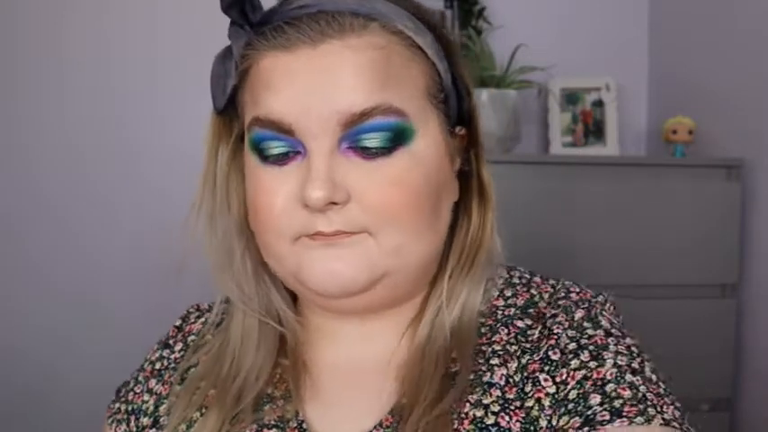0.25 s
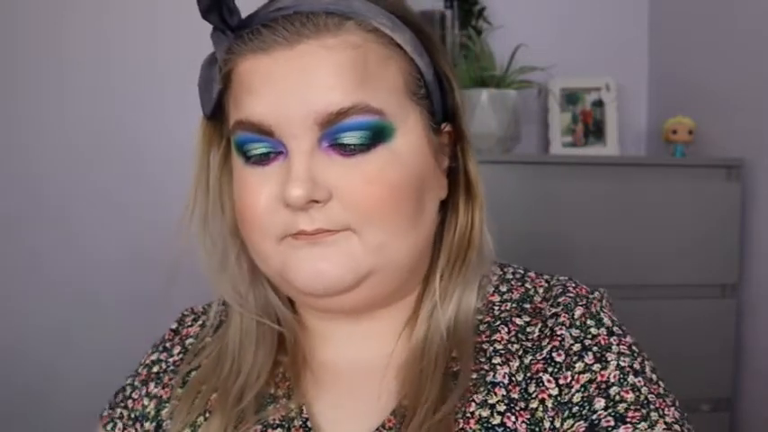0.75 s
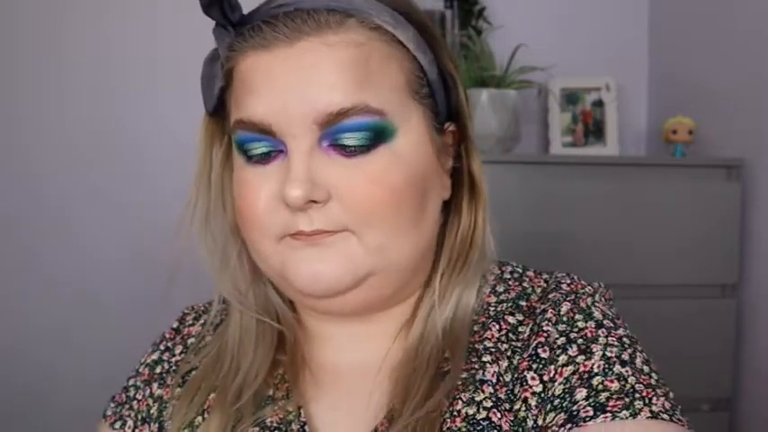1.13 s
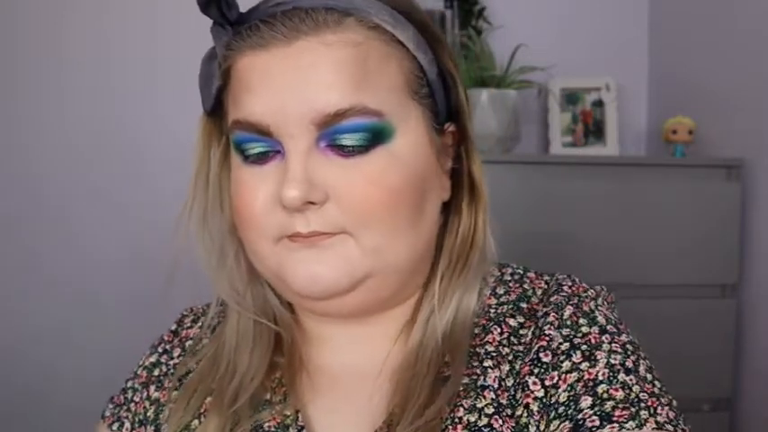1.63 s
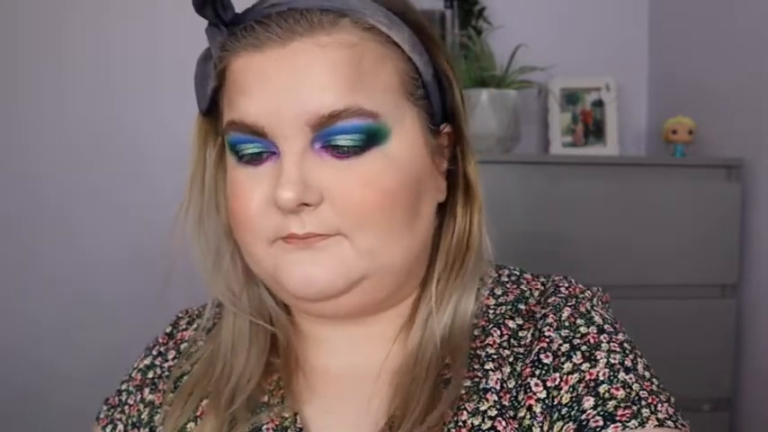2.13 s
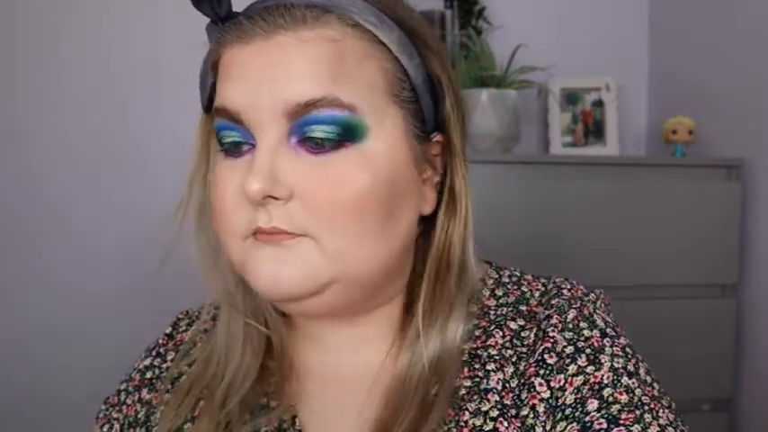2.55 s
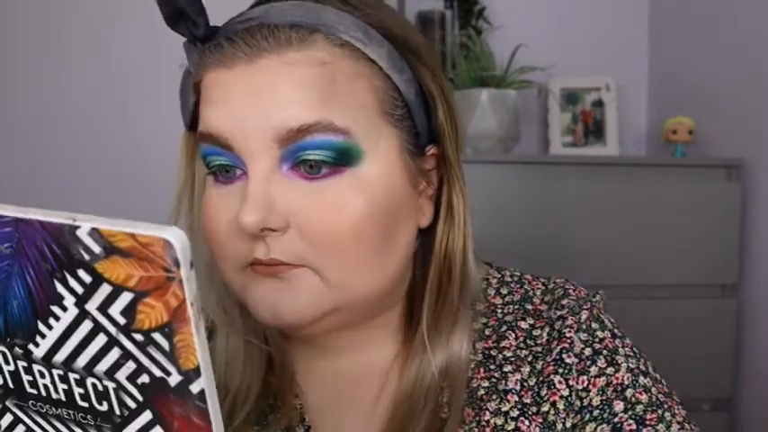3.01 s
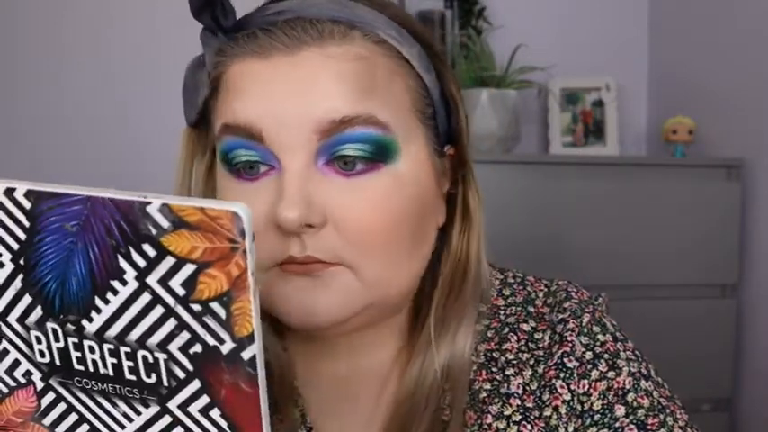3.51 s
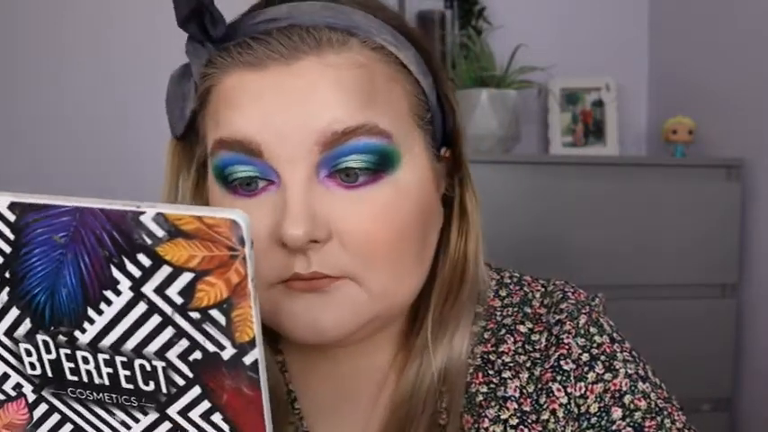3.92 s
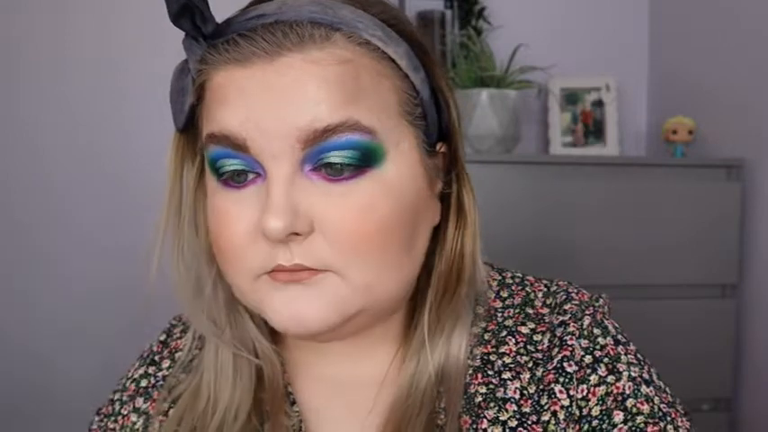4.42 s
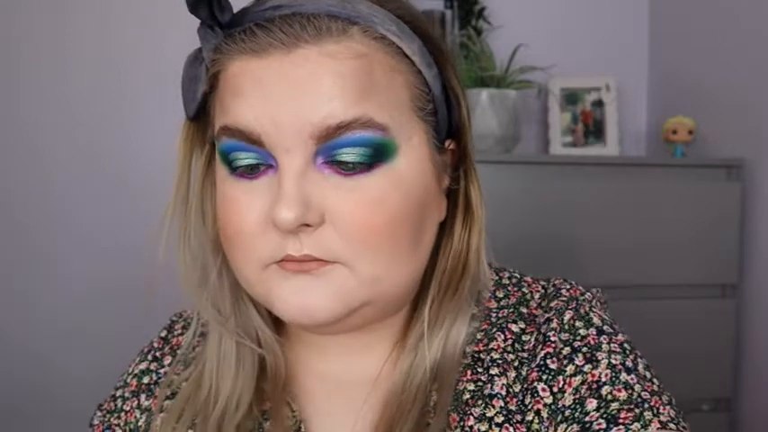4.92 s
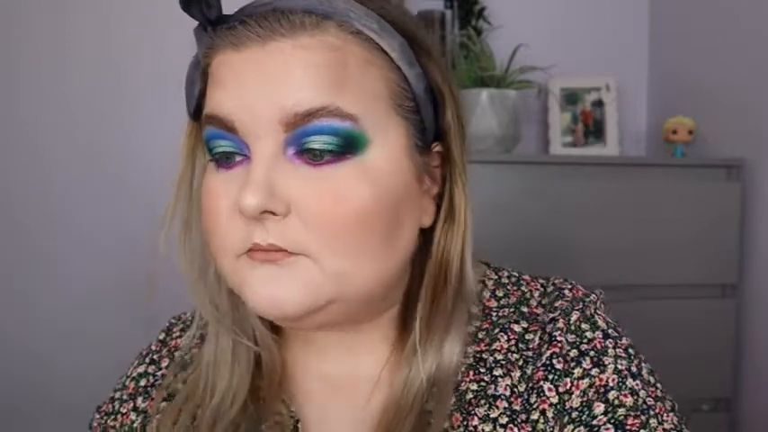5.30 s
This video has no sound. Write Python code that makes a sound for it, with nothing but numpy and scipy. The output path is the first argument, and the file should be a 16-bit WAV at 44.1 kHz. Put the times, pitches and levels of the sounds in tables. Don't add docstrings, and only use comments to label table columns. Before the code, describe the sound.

Close to a microphone in a small furnished room, a hard plastic case lands on a desk and bounces in a rapid rattling clatter. Then it is dragged, fingers rub, and small cases knock, click and latch. A near-silent pause with faint fan hum follows, before a bright snap, a tap and a little more scraping.

```python
import sys
import numpy as np
from scipy import signal
from scipy.fft import rfft, irfft, next_fast_len
from scipy.io import wavfile
from scipy.ndimage import uniform_filter1d, minimum_filter1d

SR = 44100
rng = np.random.default_rng(int(sys.argv[2]) if len(sys.argv) > 2 else 0)


def volts(x):
    e = np.asarray(x, float) / 20
    return 10 ** e


def bounce(signal):
    frames = np.transpose(np.atleast_2d(signal))
    limited = np.clip(frames, -1, 1)
    pcm = np.round(limited * 32767).astype(np.int16)
    wavfile.write(sys.argv[1], SR, pcm)


N = 244755


def level(x, db):
    return x * volts(db) / np.sqrt(np.mean(x ** 2))


def colour(x, gain_of_hz):
    size = next_fast_len(len(x))
    hz = np.arange(size // 2 + 1) * SR / size + 1
    return irfft(rfft(x, size) * gain_of_hz(hz), size)[:len(x)]


def curve(table, hz):
    corner_hz, db = np.transpose(table)
    return np.interp(np.log(hz), np.log(corner_hz), db)


def resonate(x, modes):
    def gain(f):
        return sum(volts(db) / (1 + ((f - hz ** 2 / f) / width) ** 2) for hz, width, db in modes)
    return colour(x, gain)


def ring_on(x, modes):
    t = np.arange(SR // 4) / SR
    response = 0
    for hz, width, db in modes:
        response = response + volts(db) * np.sin(2 * np.pi * hz * t) * np.exp(-np.pi * width * t)
    return signal.fftconvolve(x, response)[:N]


def highpass(x, order, hz):
    return signal.sosfilt(signal.butter(order, hz, "high", fs=SR, output="sos"), x)


def lowpass(order, hz):
    return signal.butter(order, hz, fs=SR, output="sos")


def walk(rate):
    hold = int(SR / rate)
    steps = np.repeat(rng.standard_normal(N // hold + 1), hold)
    return uniform_filter1d(uniform_filter1d(steps, hold), hold)[:N]


# frequency in Hz, rms level in dB.
FAN_TONES = [(134.6, -70), (220.7, -62.5), (269.2, -65), (301.5, -67), (446.8, -59.5), (522.2, -70),
             (549.1, -61.5), (586.8, -69), (672.9, -72)]
# frequency in Hz, density in dB per Hz.
AIR_COLOUR = [(12, -20.5), (20, -4), (44, -4.5), (168, -11), (228, -5), (285, -6), (388, -8.5), (446, -11),
              (499, -9.5), (542, -14), (624, -8.5), (1000, -15), (2820, -21), (12100, -24), (16000, -26)]


def background():
    air = level(colour(rng.standard_normal(N), lambda f: volts(curve(AIR_COLOUR, f))), -55)
    for hz, db in FAN_TONES:
        phase = 2 * np.pi * np.cumsum(hz + 2.14 * walk(11)) / SR
        air = air + np.sqrt(2) * volts(db + 1.5 * walk(11)) * np.sin(phase)
    return air


def swell(table, column=3):
    t, power = np.arange(N) / SR, 0
    for row in table:
        s, rise_s, fall_s = row[:3]
        off = np.abs(t - s) / np.where(t < s, rise_s, fall_s)
        power = power + volts(row[column] - 14.5 * off ** 1.32) ** 2
    return np.sqrt(power)


def rub(modes, gain, grain_db, flicker_db):
    grain_size = np.minimum(rng.exponential(size=N), 4.5)
    grains = rng.standard_normal(N) * volts(grain_db * grain_size)
    return level(resonate(grains, modes), 0) * gain * volts(flicker_db * walk(45))


# peak in seconds, rise in seconds, fall in seconds, level in dB.
LEANS = [(1.0, .9, .9, -64), (1.25, .06, 0.053, -59), (1.68, .08, .06, -55.5), (1.9, 0.069, 0.085, -47.5),
         (2.07, .06, 0.13, -59), (2.378, 0.05, 0.056, -48), (2.5, 0.11, 0.076, -55.5),
         (2.64, 0.097, 0.066, -52), (4.58, .07, 0.034, -54), (5.0, 0.52, 0.36, -60.5),
         (5.28, 0.13, .1, -59)]
# frequency in Hz, width in Hz, level in dB.
LEAN_MODES = [(58, 35, 0), (147, 28, -1.5)]


def leaning_arms():
    return rub(LEAN_MODES, swell(LEANS), grain_db=1.1, flicker_db=2.5)


# peak in seconds, rise in seconds, fall in seconds, level in dB.
DRAG_STROKES = [
    (0.98, 0.065, 0.12, -38),
    (1.23, 0.016, 0.05, -48.5),
    (1.59, 0.017, 0.028, -52),
    (1.68, 0.045, 0.034, -41.5),
    (1.95, .03, .04, -65.5),
    (2.14, 0.055, 0.048, -45.5),
    (2.37, 0.034, 0.046, -47.5),
    (4.9, 0.046, 0.039, -46),
    (5.07, .02, .02, -60),
    (5.215, 0.055, 0.019, -50),
]
# frequency in Hz, width in Hz, level in dB.
DRAG_MODES = [(378, 203, 16), (767, 77, 8.5), (1037, 550, 7)]


def dragged_case():
    return rub(DRAG_MODES, swell(DRAG_STROKES), grain_db=3, flicker_db=2.5)


# fastest motion in seconds, rise in seconds,
# fall in seconds, skin hiss in dB, case scrape in dB.
HAND_STROKES = [(0.1, 0.9, 0.45, -61.5, -51), (0.85, 0.12, 0.087, -53, -56), (1.07, 0.22, 0.15, -57.5, -46),
                (1.22, 0.065, 0.12, -49.5, -47), (1.34, 0.067, 0.11, -72, -52),
                (1.45, 0.11, 0.12, -50, -51.5), (1.58, .05, 0.095, -56.5, -49.5),
                (1.68, 0.075, 0.049, -49, -47.5), (1.86, 0.25, 0.13, -55, -54.5),
                (1.95, 0.055, 0.021, -49.5, -50), (2.07, .07, 0.073, -44, -44),
                (2.14, 0.033, 0.044, -43.5, -45), (2.3, 0.09, .06, -49, -46.5),
                (2.365, 0.079, 0.036, -40.5, -47.5), (2.62, 0.32, 0.6, -65.5, -58),
                (2.98, 0.14, 0.1, -76.5, -52), (4.6, 0.24, .1, -63.5, -56.5),
                (4.71, 0.17, 0.077, -49, -47.5), (4.85, 0.098, .07, -45.5, -44.5),
                (5.01, 0.082, 0.071, -42, -49), (5.11, .08, 0.084, -52.5, -54),
                (5.195, .05, 0.035, -46, -47.5), (5.25, .04, .07, -59.5, -61),
                (5.5, 0.36, 0.29, -72.5, -53.5)]
# frequency in Hz, width in Hz, level in dB.
SKIN_MODES = [(6180, 6000, 6), (10880, 13000, -8.5)]
# frequency in Hz, width in Hz, level in dB.
SCRAPE_MODES = [(2330, 6300, 36), (4300, 1800, -31)]


def hand_strokes():
    hiss = rub(SKIN_MODES, swell(HAND_STROKES, column=3), grain_db=2.5, flicker_db=1.5)
    scrape = rub(SCRAPE_MODES, swell(HAND_STROKES, column=4), grain_db=3, flicker_db=1.5)
    return hiss + scrape


# peak in seconds, rise in seconds, fall in seconds, level in dB.
PAN_RATTLES = [
    (0.46, 0.022, .06, -26),
    (0.57, 0.08, .06, -28),
    (0.63, 0.026, .06, -27),
    (0.76, .09, 0.095, -31),
]
# frequency in Hz, width in Hz, level in dB.
PAN_MODES = [(410, 200, 1), (1090, 630, 5.5), (1530, 500, 1), (3460, 1800, -10.5)]


def rattling_pans():
    return rub(PAN_MODES, swell(PAN_RATTLES), grain_db=4, flicker_db=2.5)


# body, main, edge, tick and snap, in Hz.
GROUP_BORDERS_HZ = [900, 2400, 4500, 8000]
CRUSH_SHARE = [0, .3, 1, 1, 1]


def knocks(table, tone, cycles, contact_s, grit_db, scatter_db, snap_db):
    length, grit_length = 4096, 2048
    out, t = np.zeros((2, N + length)), np.arange(length) / SR
    burst_t = t[:grit_length]
    ladder = np.geomspace(300, 14500, num=30)
    member = np.digitize(ladder, GROUP_BORDERS_HZ) == np.arange(5)[:, None]
    weight = (-1) ** np.arange(30) * ladder ** .6 * volts(curve(tone, ladder))
    life = cycles * (ladder[:, None] / 1000) ** 0.29
    crush = np.outer(CRUSH_SHARE, volts(-8.5) * np.exp(-burst_t / 0.0014))
    grit = volts(grit_db) * np.exp(-burst_t / contact_s)
    for s, peak_db, body_db, edge_db, tick_db in table:
        shift, size = rng.standard_normal((2, 30))
        cycle = np.outer(ladder * (1 + 0.022 * shift), t)
        decay = np.exp(-np.log(1000) * cycle / life)
        ring = np.sin(2 * np.pi * cycle) * decay * (1 - np.exp(-cycle / 0.36)) ** 2
        contact = rng.standard_normal(grit_length) * (grit + crush)
        contact[:, 0] = 1
        plain = (member * weight * volts(scatter_db * size)) @ ring
        gritty = signal.fftconvolve(plain, contact, axes=1)[:, :length]
        groups = np.array([gritty, plain])
        groups /= np.abs(groups).max(axis=2, keepdims=True)
        group_db = np.array([body_db, 0, edge_db, tick_db, tick_db + snap_db])
        start = int(s * SR)
        out[:, start:start + length] += volts(peak_db - 0.5 + group_db) @ groups
    return out[:, :N]


# start in seconds, peak in dB, then hollow body, edge and tick in dB against the peak.
CLICK_KNOCKS = [
    (0.8909, -34, -41, -2.5, -25),
    (1.2466, -15.5, -6, 1.5, 2),
    (1.6257, -33.5, -2.5, -4, -5),
    (1.645, -44, 1.5, -13, -16),
    (1.6641, -31, -7, 3, -7),
    (1.9207, -24.5, -2.5, 0.5, -7),
    (2.0886, -21.5, -9, -3, 1.5),
    (2.0994, -31.5, -30, 3, -8),
    (2.1374, -34.5, -10, -13, -10),
    (2.3965, -56, 0, 4, 2),
]
LATCH_KNOCKS = [
    (1.4729, -20.5, -12.5, 4, -2),
    (1.497, -16.5, -5.5, 1.6, 8),
]
SNAP_KNOCKS = [
    (4.792, -15, -20, 7.2, 1.7),
]
TAP_KNOCKS = [
    (4.8758, -19, -9, 0.5, -5.5),
    (5.1916, -43, -2, -9, -4),
]
HOLLOW_KNOCKS = [
    (1.1036, -20, 1.2, 7, 3),
    (5.0465, -36, 7.8, 3, 9),
]
TICK_KNOCKS = [
    (3.21, -52, -1, 3.2, 6.2),
    (4.105, -53, -10, 1.8, 1.8),
]
# frequency in Hz, level in dB per Hz.
CLICK_TONE = [(160, -37), (300, -4.5), (480, -3.5), (700, 3.5), (900, -3), (1300, 1), (2200, -3.5),
              (7330, -12.5), (15000, -35)]
LATCH_TONE = [(160, -37), (280, -7), (420, -5.5), (700, -19), (1810, -1.5), (2000, -4.5), (3700, -2.5),
              (5250, 2), (6860, -6), (9570, -11.5), (11300, -32.5), (13100, -13), (15000, -35)]
SNAP_TONE = [(160, -52), (280, -28), (899, -17), (1060, 0), (1780, -11), (1900, -5), (2840, -5.5),
             (3580, -6.5), (4090, -3), (6740, -12), (15000, -61)]
HOLLOW_TONE = [(160, -20), (300, -1), (410, 5), (540, -9), (1000, -18.5), (1510, 3), (2300, -1),
               (4500, -1.5), (15000, -38)]


def small_knocks():
    out = 0
    for table, tone, snap_db in [(CLICK_KNOCKS, CLICK_TONE, -7), (LATCH_KNOCKS, LATCH_TONE, -1.5),
                                 (SNAP_KNOCKS, SNAP_TONE, -13), (TAP_KNOCKS, CLICK_TONE, -12),
                                 (HOLLOW_KNOCKS, HOLLOW_TONE, -10), (TICK_KNOCKS, SNAP_TONE, -3)]:
        out = out + knocks(table, tone, cycles=8.2, contact_s=0.011, grit_db=-30, scatter_db=2.0, snap_db=snap_db)
    return out


# frequency in Hz, width in Hz, level in dB.
BOOM_MODES = [(139, 6.1, -28.5), (303, 150, 1.5)]


def desk_boom(blow):
    return highpass(0.012 * ring_on(np.abs(blow), BOOM_MODES), 4, 118)


# start in seconds, peak in dB,
# then hollow body, edge and tick in dB against the peak.
DROP_KNOCKS = [(0.4385, -6, -3.5, -3.5, -15.5), (0.476, -4, -7, -2.5, -15), (0.5033, -8, -12.5, -12, -19),
               (0.5297, -11, -7.5, -5, -22), (0.5519, -19, 1, -9, -12.5), (0.5844, -21, 1.5, -12, -22.5),
               (0.6055, -3.5, -1.5, -1, -5), (0.6658, -8, -2.5, 5.5, -5.5), (0.6973, -12, -9, 1, -11),
               (0.7166, -18.5, 0.5, 5, 0), (0.7333, -26.5, -4, -18, 2), (0.7474, -18, -12, -4, -16.5),
               (0.8199, -37.5, -18, -20, -0.5)]
# frequency in Hz, level in dB per Hz.
DROP_TONE = [(160, -30), (300, -1.5), (420, 1.5), (850, -5), (1200, -0.5), (1700, -5), (3400, -7.5),
             (4800, -17.5), (6200, -9.5), (15000, -50)]
# frequency in Hz, width in Hz, level in dB.
CASE_MODES = [(416, 17, -27.5), (1145, 62, -26), (1290, 45.4, -30.5), (1686, 180, -5.5), (2038, 160, -5.5),
              (3230, 190, -17), (6780, 200, -6.5)]


def dropped_case():
    drop = knocks(DROP_KNOCKS, DROP_TONE, cycles=8.0, contact_s=0.024, grit_db=-32.5, scatter_db=3.25, snap_db=-12.5)
    return drop + 0.045 * ring_on(drop[0], CASE_MODES)


# frequency in Hz, 60 dB decay time in seconds, level in dB.
ROOM_BANDS = [(150, 0.14, -10.5), (400, 0.63, -13.5), (1150, 0.19, 0), (3350, 0.2, -7), (6300, 0.18, -4.5),
              (12500, 0.13, 2.5)]
# delay in seconds, level in dB.
DESK_REPEATS = [(.0023, -21), (.0047, -24.5)]


def room(x, wet):
    t = np.arange(SR // 2) / SR
    tail = np.zeros(len(t))
    for hz, t60, db in ROOM_BANDS:
        band = resonate(rng.standard_normal(len(t)), [(hz, 1.86 * hz, db)])
        tail += 0.039 * band * np.exp(-np.log(1000) * t / t60) * (1 - np.exp(-t / 0.001))
    echoes = sum(volts(db) * np.roll(x, int(delay * SR)) for delay, db in DESK_REPEATS)
    return x + echoes + signal.fftconvolve(wet, tail)[:N]


def scene():
    rubbing = leaning_arms() + dragged_case() + hand_strokes() + rattling_pans()
    small, drop = small_knocks(), dropped_case()
    to_walls = volts(0.5) * drop[1] + volts(1) * small[1]
    heard = highpass(room(drop[0] + small[0], to_walls), 3, 230)
    return (heard + desk_boom(drop[0]) + rubbing + background())[None]


def band_limit(x):
    return signal.sosfilt(signal.butter(12, 16300, fs=SR, output="sos"), x)


def record(dry):
    envelope = np.sqrt(uniform_filter1d(dry ** 2, size=128) + 1e-12)
    ahead = np.roll(-minimum_filter1d(-envelope, size=280), -330)
    low = signal.sosfiltfilt(lowpass(4, 1300), dry)

    def keep(margin_db):
        return np.clip(volts(margin_db) * envelope / ahead, 0, 1) ** 4

    ducked = (dry - low) * keep(22.5) + low * keep(30)
    soft = signal.sosfilt(lowpass(8, 16000), ducked)
    return band_limit(np.clip(soft, -1, 1))


dry = scene()
out = record(dry)
bounce(out)
```